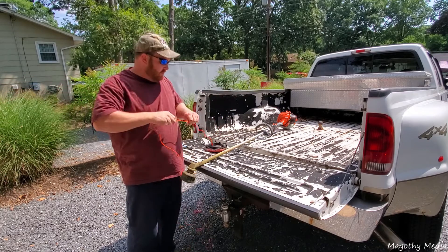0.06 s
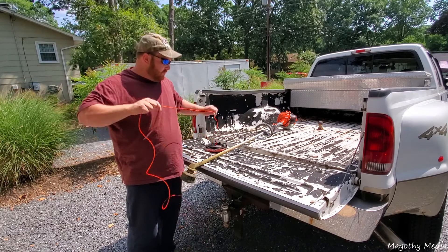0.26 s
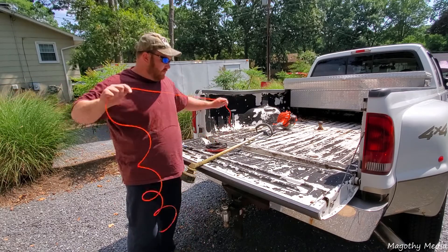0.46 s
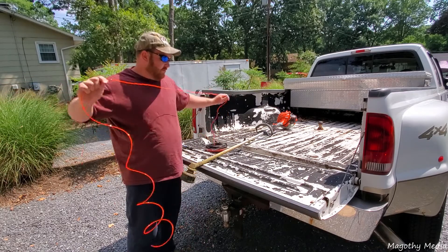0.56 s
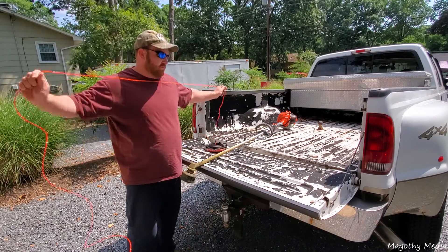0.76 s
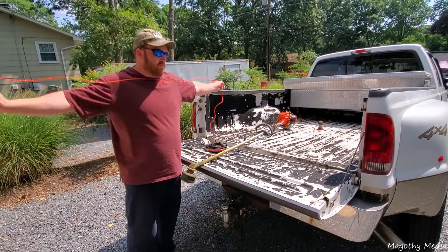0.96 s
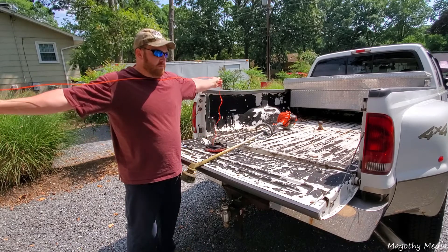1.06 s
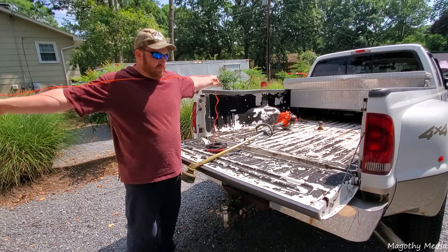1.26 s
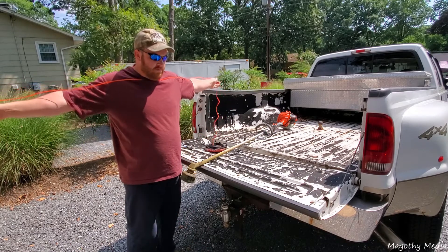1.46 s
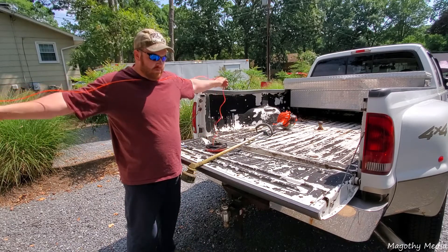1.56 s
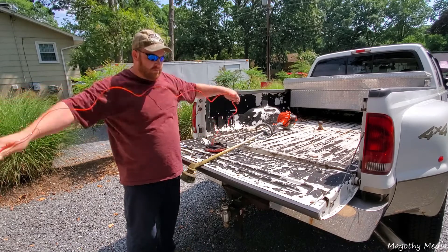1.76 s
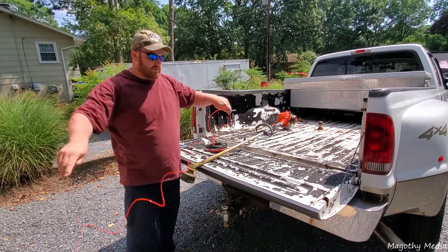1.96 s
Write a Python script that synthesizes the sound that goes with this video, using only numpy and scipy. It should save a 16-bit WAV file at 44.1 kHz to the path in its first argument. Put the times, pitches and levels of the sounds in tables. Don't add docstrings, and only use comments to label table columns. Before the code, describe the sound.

Stiff plastic line is dragged off a coil in a metal truck bed: light rustle, a quick clatter, one sharp loud crack, scattered knocks, then sparse ticks; close stereo microphone outdoors with low wind rumble.

```python
import sys
import numpy as np
from scipy import signal
from scipy.fft import rfft, irfft
from scipy.io import wavfile

SR = 44100
rng = np.random.default_rng(int(sys.argv[2]) if len(sys.argv) > 2 else 0)


def invert_db(x):
    u = np.asarray(x, float) / 20
    return 10 ** u


def put_to_file(sound):
    columns = np.atleast_2d(sound).T
    safe = np.clip(columns, -1, 1)
    whole_steps = np.round(safe * 32767)
    wavfile.write(sys.argv[1], SR, whole_steps.astype(np.int16))


N = 88200

# (frequency [Hz], level [dB])
RUSTLE_SPECTRUM = [(150, -9), (300, -9), (600, -4), (900, -12), (1530, -12.5), (4320, -13.5), (5150, -20.5),
                   (14000, -26.5), (16000, -18.5)]
BOTH_SIDES = np.array([[1], [-1]])
TIME_S = np.arange(N) / SR


def in_time(points):
    s, db = np.transpose(points)
    return np.interp(TIME_S, s, db)


def at_hz(points, hz):
    point_hz, value = np.transpose(points)
    return np.interp(np.log(np.maximum(hz, 1)), np.log(point_hz), value)


def rms_one(x):
    return x / np.sqrt(np.mean(x ** 2) + 1e-20)


def drift(rate_hz):
    r = np.exp(-80 * np.pi * rate_hz / SR)
    slow = signal.lfilter([1], [1, -2 * r, r * r], rng.standard_normal(N // 40 + 2002))
    slow = slow[2000:]
    return np.interp(np.arange(N) / 40, np.arange(len(slow)), rms_one(slow))


def filtered(x, order, hz, kind):
    return signal.sosfilt(signal.butter(order, hz, kind, fs=SR, output="sos"), x)


def panned(left_right_db):
    return invert_db(left_right_db / 2 * BOTH_SIDES)


def coloured(spectrum, alike=1, lean=0):
    # (frequency [Hz], likeness [0-1])
    likeness = [(150, 1), (500, 0.81), (2000, 0.43), (5000, 0.13), (12000, 0.08)]
    # (frequency [Hz], left-right [dB])
    side_lean = [(200, 0.5), (1300, -2), (4400, 2.5), (8000, -1), (15000, 15.5)]
    hz = np.arange(N // 2 + 1) * SR / N
    gain = invert_db(at_hz(spectrum, hz)) * (hz > 0.8 * spectrum[0][0])
    c = np.clip(alike * at_hz(likeness, hz), 0, 1)
    mid, side = rfft(rng.standard_normal((2, N)), axis=1) * gain
    sides = np.sqrt(1 + c) * mid + np.sqrt(1 - c) * side * BOTH_SIDES
    return rms_one(irfft(sides * panned(lean * at_hz(side_lean, hz)), N, axis=1))


def burst(s, hold_ms, die_ms, rise_ms):
    t_ms = (TIME_S - s) * 1000
    rise = np.clip(t_ms / rise_ms + 1, 0, 1) ** 2
    return rise * np.exp(-np.maximum(t_ms - hold_ms, 0) / die_ms)


def bed(force, spread_db):
    # (frequency [Hz], level [dB], T60 [s])
    modes = [(624, -5, .07), (694, -17, .15), (813, 0, .14), (1010, -11, .1), (1243, -9, .1),
             (1384, -17, .1), (1875, -10, .1), (2356, -13, .1), (2860, -9, .05), (3230, -10, .06),
             (4200, -12, .08), (500, -16, .08)]
    out = 0
    for k, (hz, db, t60) in enumerate(modes):
        r, w = invert_db(-60 / (t60 * SR)), 2 * np.pi * hz / SR
        caught = force * invert_db(db + spread_db * drift(6.1)) + 1e-18
        ring = signal.lfilter([0.5, 0, -0.5], [1, -2 * r * np.cos(w), r * r], caught)
        out = out + (-1) ** k * ring * invert_db(rng.normal(0, 1) * BOTH_SIDES)
    return out


def yard():
    # (frequency [Hz], density [dB per Hz])
    spectrum = [(76, 2), (130, 5), (285, -7), (1710, -12.5), (2090, -17.5), (7010, -12), (8230, -22.5),
                (14800, -23), (16000, -58.5)]
    return invert_db(-56.5 + drift(8.2)) * coloured(spectrum, alike=0.32)


def wind():
    # (frequency [Hz], density [dB per Hz])
    spectrum = [(12, -55.5), (20, -28), (38, 10), (62, 4.5), (95, 1.5), (200, -42), (260, -60), (440, -120)]
    # (time [s], level [dB])
    gust_points = [(0, -8), (.5, -4.5), (.75, -18), (1.0, -1), (1.5, -5), (2, -5.5)]
    # (time [s], peak [dB], frequency [Hz])
    puff_events = [(0.037, -42, 50.3), (0.139, -34, 59.6), (.32, -34, 71), (0.791, -29.5, 67),
                   (.85, -36.5, 50), (1.109, -32.5, 66.6), (1.362, -34.5, 53.7), (1.6, -30, 79.4),
                   (1.995, -46, 48.7)]
    gust = in_time(gust_points)
    lump_db, puff_cycles = 1.5, 0.73
    left_db = -49 + gust + lump_db * drift(4.1)
    right_db = -47.5 + gust + lump_db * drift(3.7)
    rumble = coloured(spectrum, alike=0.72) * invert_db([left_db, right_db])
    puffs = 0
    for s, db, hz in puff_events:
        t = TIME_S - s
        puffs = puffs + invert_db(db) * np.exp(-(t * hz / puff_cycles) ** 2) * np.sin(2 * np.pi * hz * t)
    return rumble + puffs * np.array([[0], [1]])


def drag():
    # (time [s], level [dB])
    slide = [(0, -70.5), (.04, -48.5), (.19, -48), (.3, -36.5), (.345, -41), (.42, -31.5), (.51, -38.5),
             (.55, -47.5), (.6, -40.5), (.68, -45.5), (.78, -43), (.93, -43), (1.02, -52), (1.095, -50.5),
             (1.13, -62), (1.76, -61.5), (1.86, -53), (1.91, -77)]
    grains_per_s, grain_db, smooth_db, ring_db = 1500, 2.2, -2, -41
    sizes = invert_db(grain_db * np.minimum(rng.exponential(1, N), 3))
    hit = rng.random(N) < grains_per_s * invert_db(1.5 * drift(25)) / SR
    grain = rms_one(signal.lfilter([1], [1, -0.985], sizes * hit))
    force = invert_db(in_time(slide)) * np.sqrt(grain ** 2 + invert_db(2 * smooth_db))
    rustle = force * coloured(RUSTLE_SPECTRUM, lean=0.95)
    return rustle + invert_db(ring_db) * bed(force * rng.standard_normal(N), 1)


def loose_end_noise():
    common, apart = rng.standard_normal((2, N))
    return common + 0.45 * apart * BOTH_SIDES


def ticks():
    # (time [s], peak [dB], length [ms], centre [Hz], left-right [dB])
    tick_events = [(.030, -34, 0.8, 10000, 12), (0.081, -31.5, 0.96, 13000, 13),
                   (0.53, -37, 1.3, 13000, 3.0), (0.53, -33, 1.0, 12800, 3.0), (0.61, -23.5, 1.4, 12000, 7),
                   (0.64, -26, 2.9, 12000, 4), (1.205, -37.5, 1.3, 14000, 8),
                   (1.3245, -23.5, 0.46, 8900, 16.5), (1.5, -27, 0.37, 12500, 10),
                   (1.334, -38, 0.57, 7100, 11), (1.351, -36, 0.53, 8700, 8), (1.174, -42, 2.96, 1140, 2),
                   (1.174, -48, 1.5, 12000, 5), (1.293, -50, 1, 12000, 8), (1.473, -48, 1.2, 12000, 7),
                   (1.717, -41, 1.3, 4400, 0), (.3565, -16, 4.4, 5600, -1), (1.3, -36.5, 1.5, 3700, 0),
                   (.847, -31, 1.1, 2400, -2), (0.5, -21, 1.8, 3000, 0), (1.473, -44, 1, 3000, 1),
                   (1.655, -50, 2, 2700, 0), (1.521, -49, 2.3, 11730, 13), (1.69, -37.5, 1.7, 1500, -9)]
    tick_db, octaves = -8.5, 1.74
    white = loose_end_noise()
    out = 0
    for s, db, ms, hz, pan_db in tick_events:
        edges = np.clip(hz * 2 ** (octaves * np.array([-0.5, 0.5])), 500, 19000)
        band = rms_one(filtered(white, 2, edges, "band"))
        out = out + invert_db(db + tick_db) * burst(s, ms, 0.2, 0.12) * band * panned(pan_db)
    return out


def knocks():
    # (time [s], peak [dB], contact length [ms], brightness [dB], ring [dB])
    knock_events = [(0.035, -34, 2.7, 10, 0), (0.056, -29.5, 3.4, 7.5, 2.5), (0.113, -33, 3.5, -3, -4),
                    (0.203, -23, 4.3, 0, 3.5), (0.2365, -9, 1.94, 3.5, 0.5), (0.2415, -8, 2.75, 0.5, -1),
                    (0.2465, -9, 2.7, 5, 0), (0.252, -16, 2.6, 3, -4), (0.258, -12.5, 2.3, 7.5, -6),
                    (0.265, -16.5, 2.9, -9, -2), (0.272, -25, 2.4, -9, -8), (0.357, 1, 4.64, 4, 1),
                    (0.370, -15, 3, -9, 11), (0.384, -26, 3.4, -9, -1.5), (0.402, -17, 4.66, 2.5, -5),
                    (0.563, -15.5, 5, -2.5, -3), (0.575, -25, 2.75, 0, 0), (0.591, -21.5, 4.1, 1, 5),
                    (0.605, -18, 2.8, 4, -15), (0.6085, -14, 3.14, 4, -1.5), (0.64, -20, 3.1, -3, -4),
                    (0.655, -25, 2.8, -11, -11), (0.68, -30, 2.8, -4, -5), (0.709, -25, 6.5, -4, -10),
                    (0.737, -23.5, 3.1, 1, 0), (0.754, -23, 3.8, 6.5, -13), (0.768, -22, 2.83, 4, -8),
                    (0.793, -27, 3.7, 6, 7), (0.806, -19.5, 3.9, 4, 1), (0.847, -23, 1.86, -14, 1),
                    (0.873, -25.5, 1.3, -1, -8), (0.879, -26, 2.55, 6, -6), (1.045, -31, 7.1, 4.5, -13),
                    (1.084, -28, 3.9, -2, -16), (1.717, -33, 2.3, -1, -13), (1.781, -43, 3.2, -3, 3),
                    (1.821, -39.5, 2.2, 2.5, -8), (1.84, -40, 1.9, -1, -2), (1.866, -39, 1.2, 3, -5)]
    # (frequency [Hz], level [dB])
    contact = [(150, -70), (450, -20), (800, -0.5), (2000, -2), (2900, -4.5), (4600, -11.5), (8500, -18.5),
               (12000, -14), (16000, -27)]
    knock_db, ring_level_db, tail_db, tail_t60_s = -12.5, -18.5, -3, 0.14
    low, high, blows = np.zeros((3, N))
    for s, db, ms, bright_db, ring_db in knock_events:
        shape = invert_db(db + knock_db) * burst(s, ms, 0.57, 0.63)
        low += shape
        high += invert_db(bright_db) * shape
        blows[int((s + ms / 2000) * SR)] = invert_db(db + ring_db + ring_level_db)
    chatter = invert_db(2.5 * signal.lfilter([0.3], [1, -0.955], rng.standard_normal(N)))
    crack = rms_one(chatter) * coloured(contact, lean=0.79)
    treble = filtered(crack, 2, 2500, "high")
    r = invert_db(-60 / (tail_t60_s * SR))
    tail = np.sqrt(signal.lfilter([SR ** -0.5], [1, -r * r], low ** 2))
    scatter = filtered(coloured(RUSTLE_SPECTRUM, alike=0.87, lean=0.96), 2, 620, "high")
    return (crack - treble) * low + treble * high + invert_db(tail_db) * tail * scatter + bed(blows, 2.2)


def narrow_rings():
    # (time [s], level [dB], hold [ms], dying [ms], frequency [Hz], width [Hz])
    ring_events = [(0.041, -42.5, 7.1, 6.6, 1170, 278), (0.203, -37.5, 19, 40, 440, 253),
                   (0.25, -31.5, 17.5, 23, 407, 162), (0.358, -18, 3.6, 2.4, 2900, 300),
                   (0.11, -48, 11, 13, 1155, 300), (0.362, -30, 4, 3.6, 744, 403),
                   (0.569, -38.5, 14, 22, 1240, 403), (0.953, -44, 8, 4.5, 2900, 900),
                   (1.05, -51, 9.5, 42, 470, 138.9), (.612, -37, 15, 25, 490, 178.7),
                   (.755, -37, 9.9, 49, 505, 185.2), (0.961, -36, 2.2, 13, 3270, 686),
                   (1.718, -46.5, 3.3, 10.0, 540, 190)]
    out = 0
    for s, db, ms, die_ms, hz, width_hz in ring_events:
        edges = [hz - width_hz / 2, hz + width_hz / 2]
        band = filtered(rng.standard_normal(N), 1, edges, "band")
        out = out + invert_db(db) * burst(s, ms, die_ms, 4.5) * rms_one(band)
    return out


def booms():
    # (time [s], level [dB])
    swells = [
        (0.165, -52),
        (0.244, -33),
        (.362, -32.5),
        (0.573, -51),
        (0.744, -47.5),
        (0.808, -47.5),
    ]
    hz, t60_s, rise_ms = 210.3, 0.37, 21
    out = 0
    for s, db in swells:
        swell = invert_db(db) * burst(s, 0, t60_s * 1000 / np.log(1000), rise_ms)
        out = out + swell * np.sin(2 * np.pi * hz * (TIME_S - s))
    return out


def brushes():
    # (start [s], level [dB], hold [ms], dying [ms], lowest frequency [Hz], left-right [dB])
    sweeps = [
        (0.952, -39.5, 7.7, 8.6, 2560, 9.5),
        (1.326, -45, 9.2, 11, 2500, 11),
        (1.35, -45, 6.7, 50, 1510, 8.5),
    ]
    white = loose_end_noise()
    out = 0
    for s, db, ms, die_ms, hz, pan_db in sweeps:
        hiss = rms_one(filtered(white, 2, hz, "high"))
        out = out + invert_db(db + 1.9 * drift(170)) * burst(s, ms, die_ms, 2.0) * hiss * panned(pan_db)
    return out


def scene():
    return yard() + wind() + drag() + ticks() + knocks() + narrow_rings() + booms() + brushes()


def band_limit(x):
    return signal.sosfilt(signal.butter(12, 16820, fs=SR, output="sos"), x)


def record(dry):
    headroom, cutoff_hz = 0.95, 15900
    soft = headroom * np.tanh(dry / headroom)
    low_pass = signal.cheby2(12, 60, cutoff_hz + 600, fs=SR, output="sos")
    mix = signal.sosfilt(low_pass, soft)
    return band_limit(mix)


dry = scene()
out = record(dry)
put_to_file(out)
```